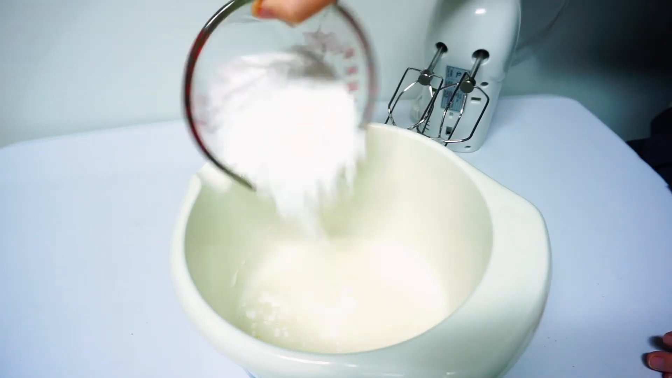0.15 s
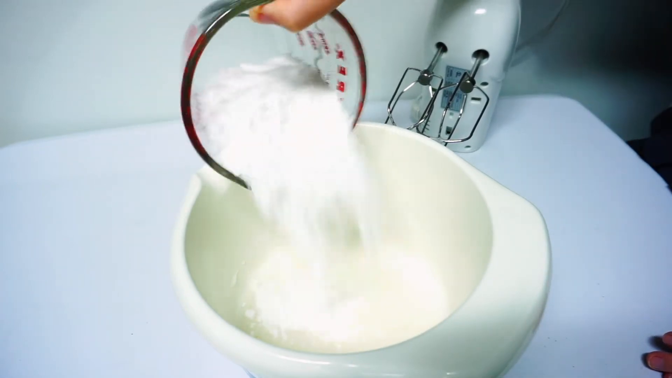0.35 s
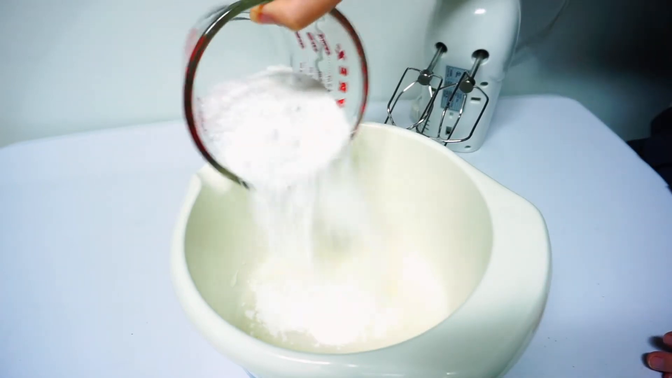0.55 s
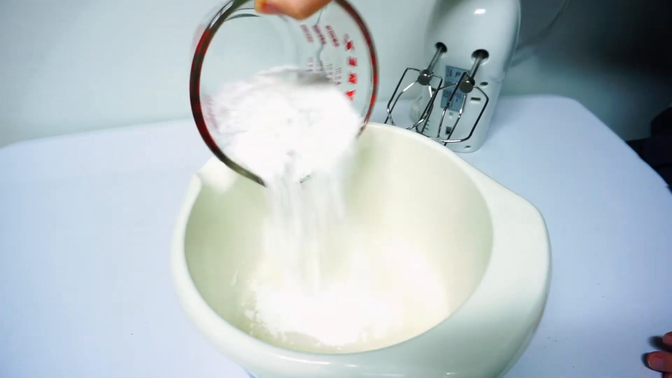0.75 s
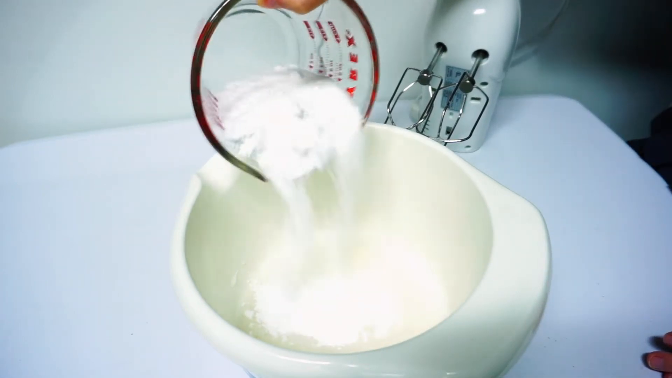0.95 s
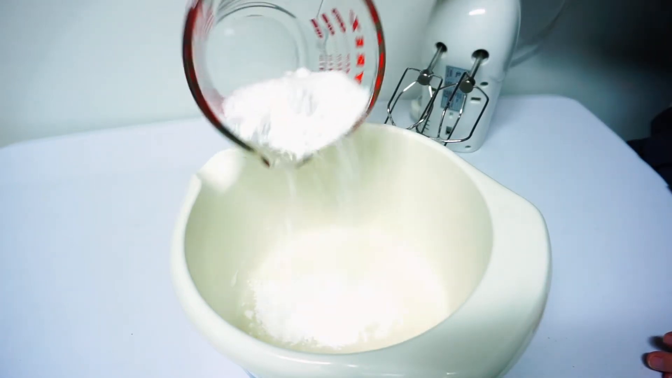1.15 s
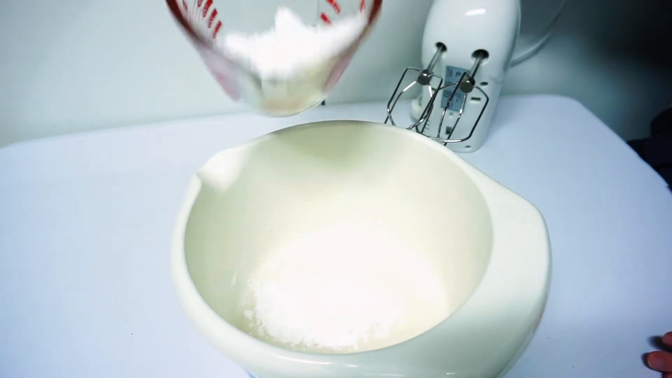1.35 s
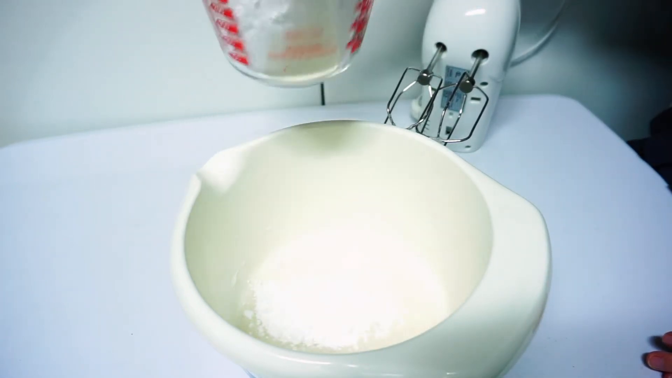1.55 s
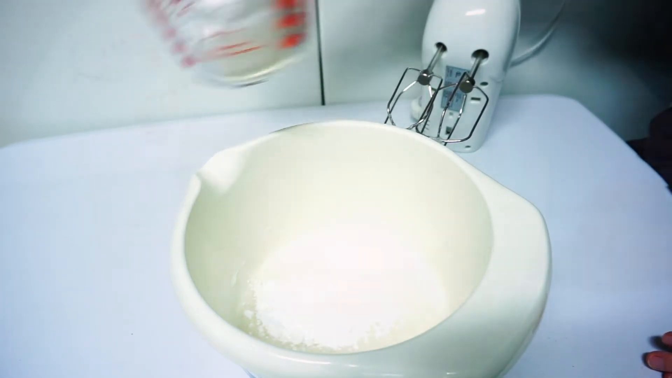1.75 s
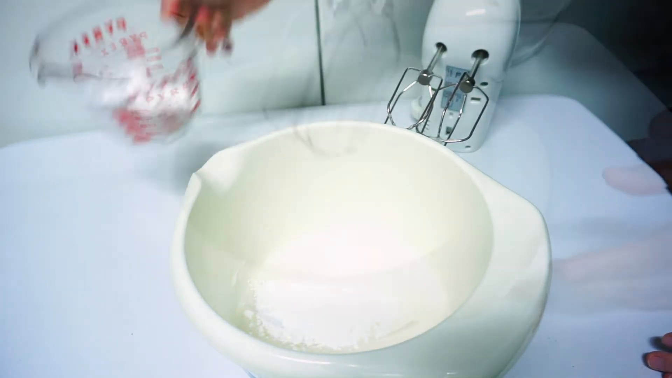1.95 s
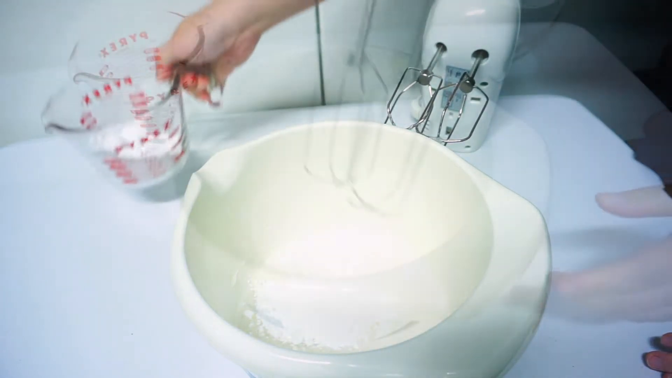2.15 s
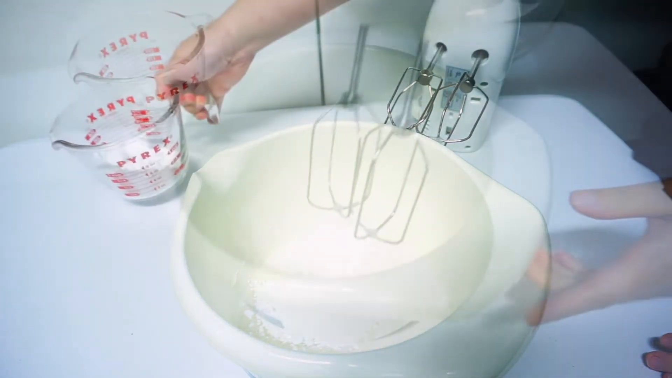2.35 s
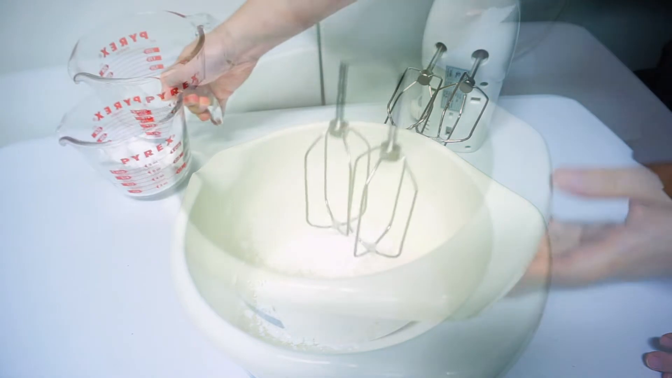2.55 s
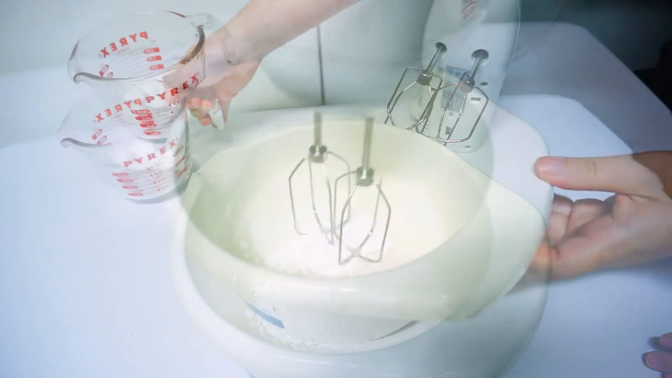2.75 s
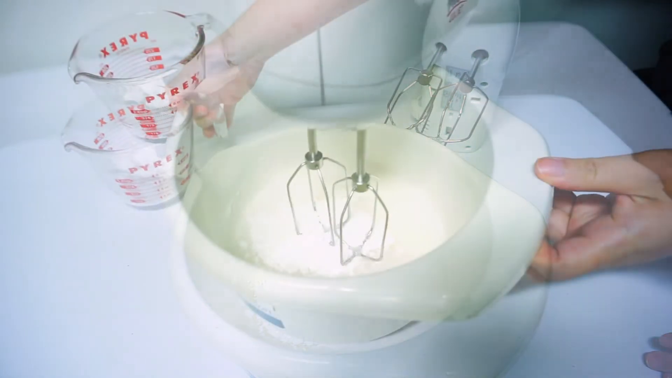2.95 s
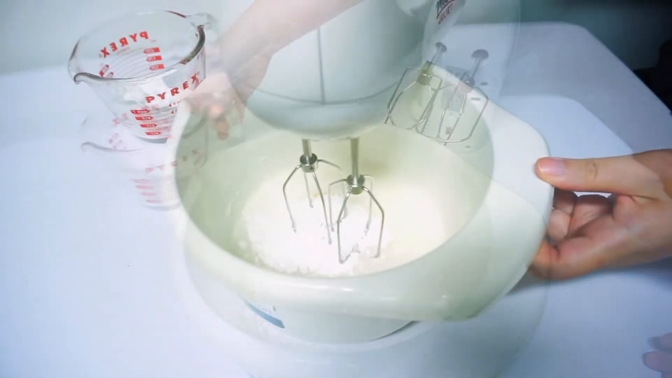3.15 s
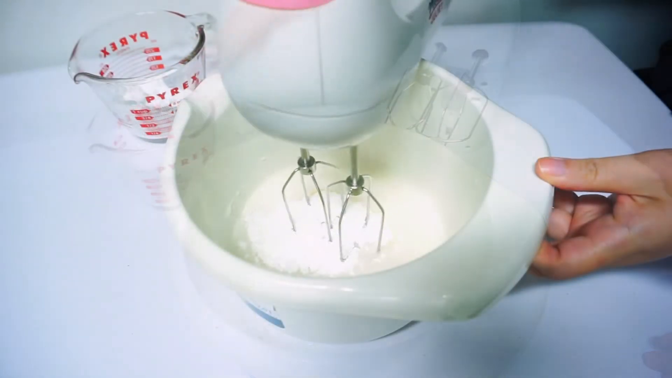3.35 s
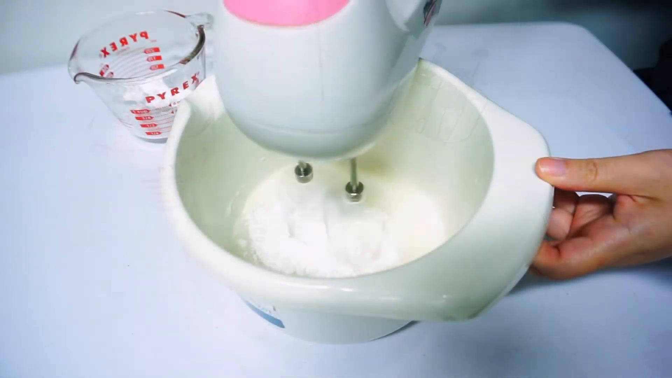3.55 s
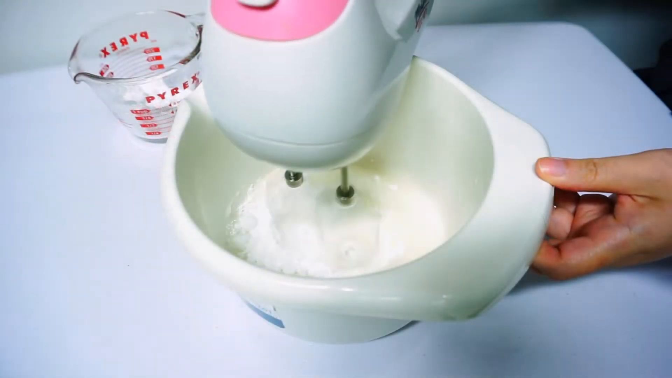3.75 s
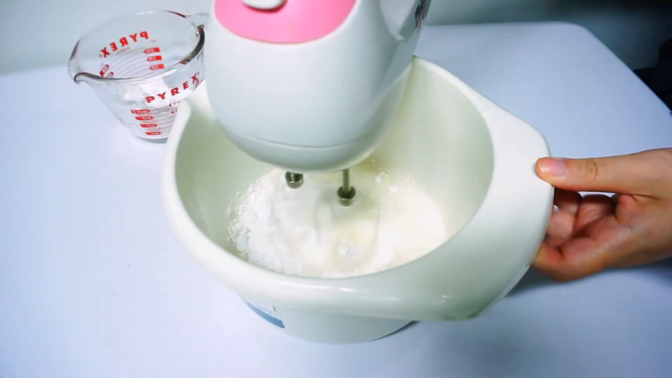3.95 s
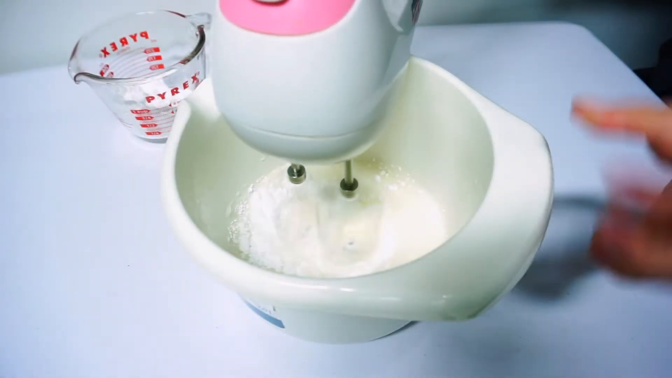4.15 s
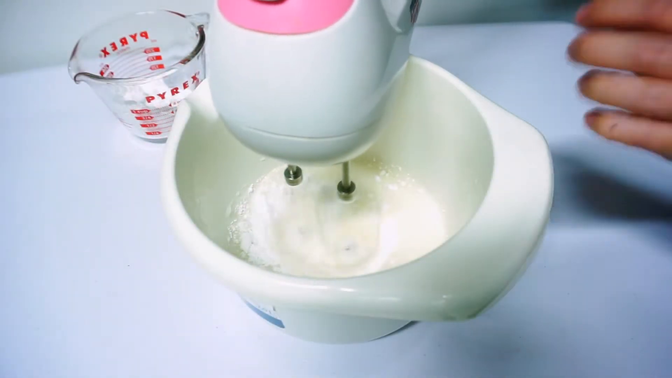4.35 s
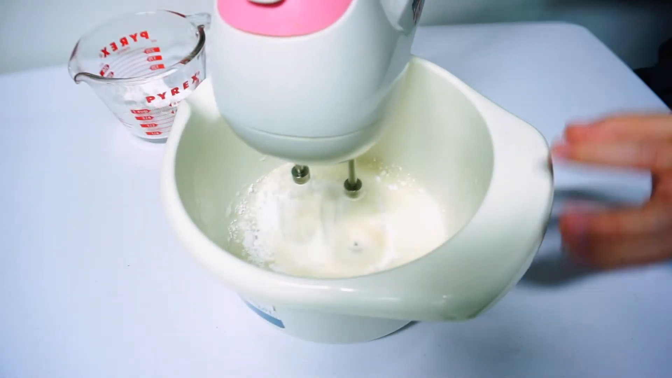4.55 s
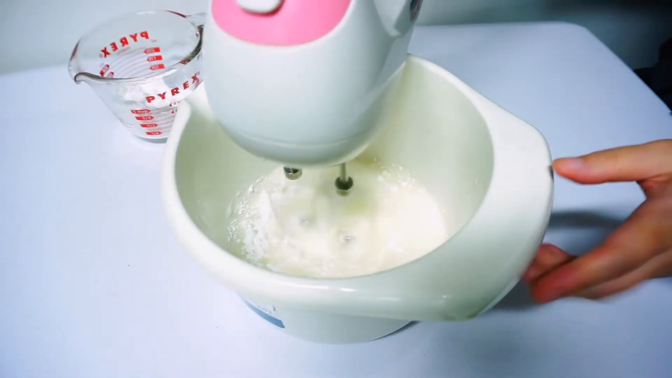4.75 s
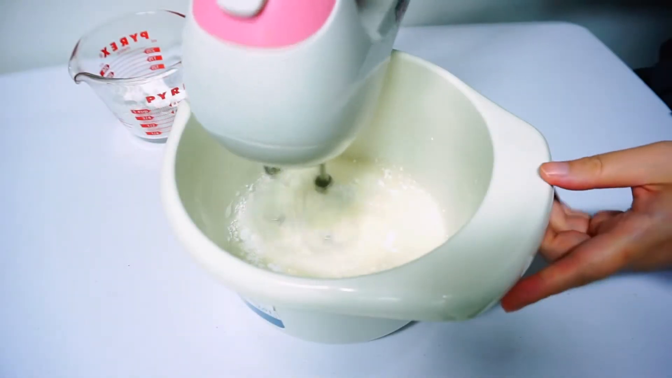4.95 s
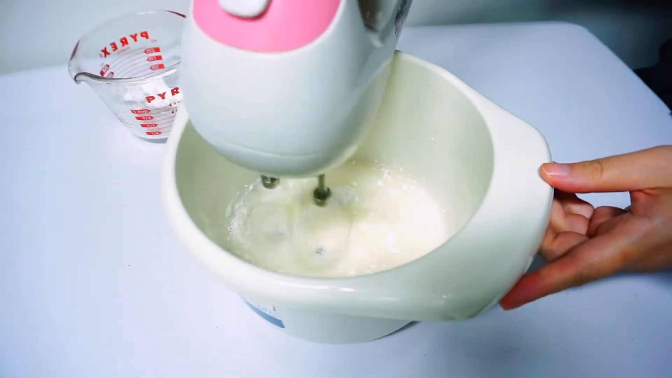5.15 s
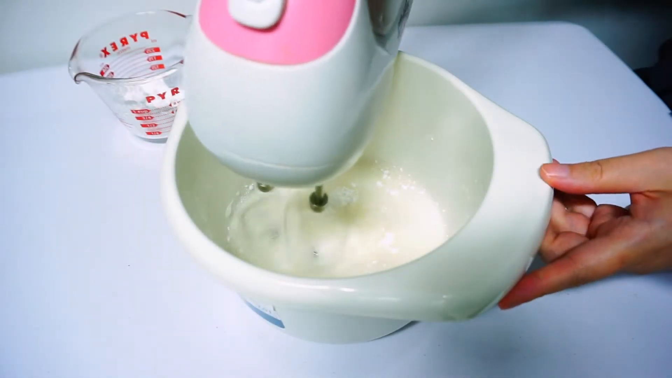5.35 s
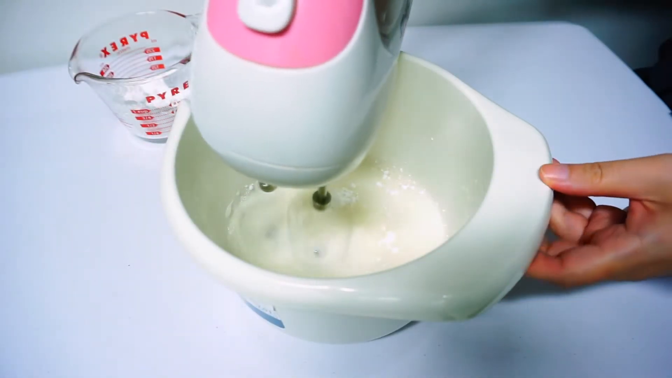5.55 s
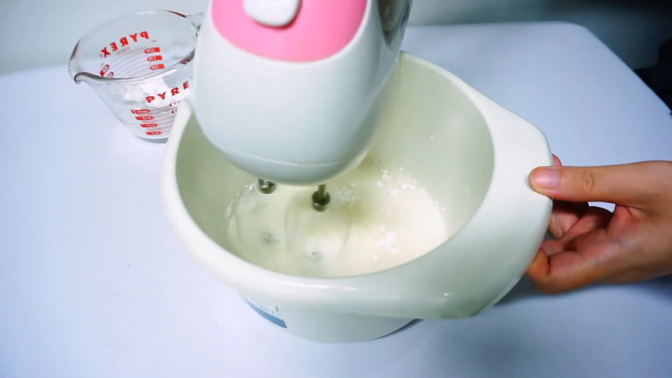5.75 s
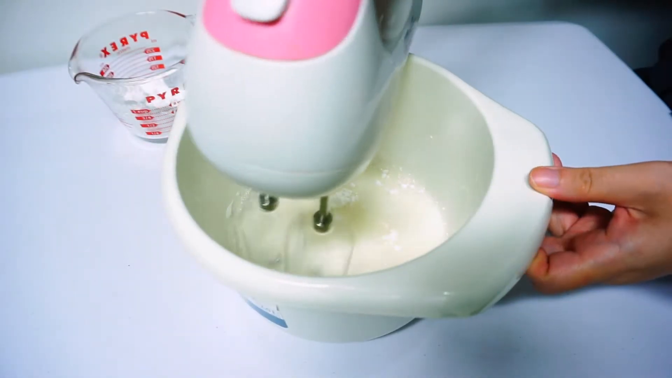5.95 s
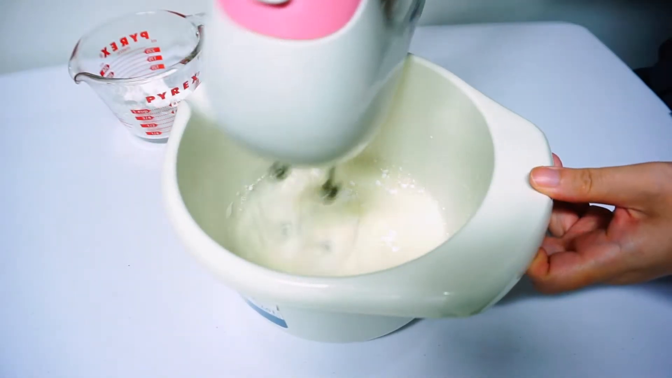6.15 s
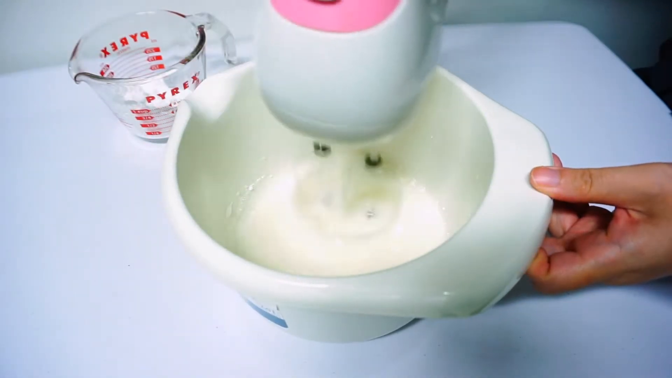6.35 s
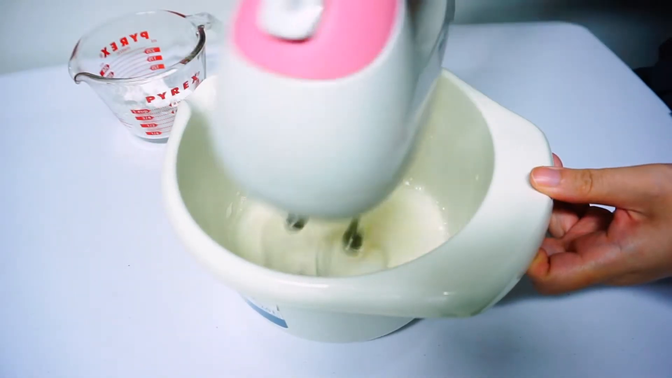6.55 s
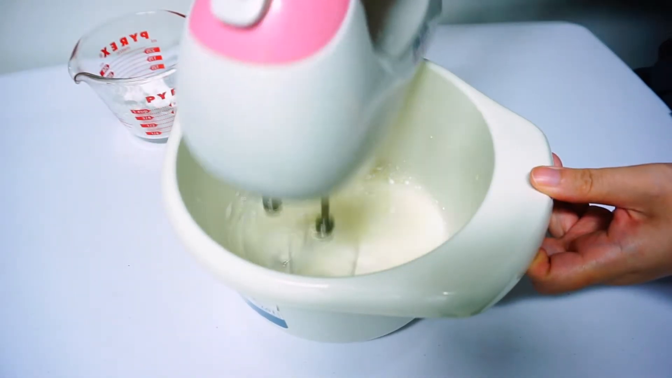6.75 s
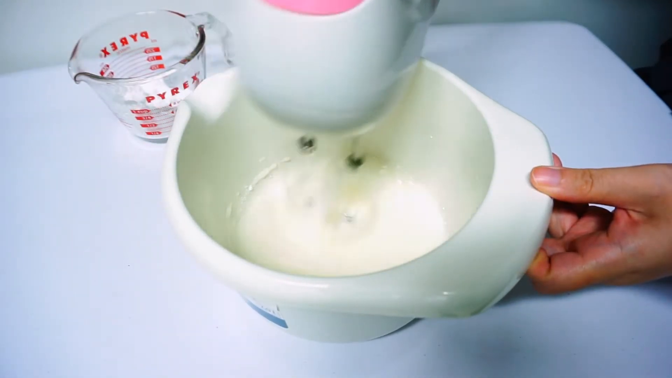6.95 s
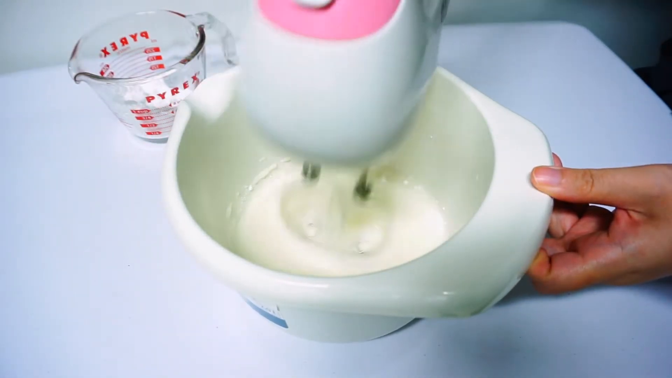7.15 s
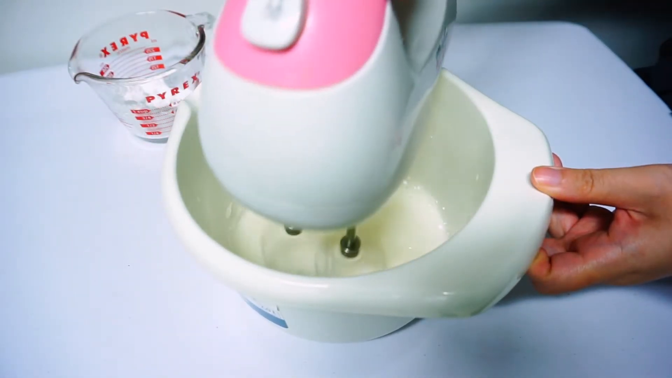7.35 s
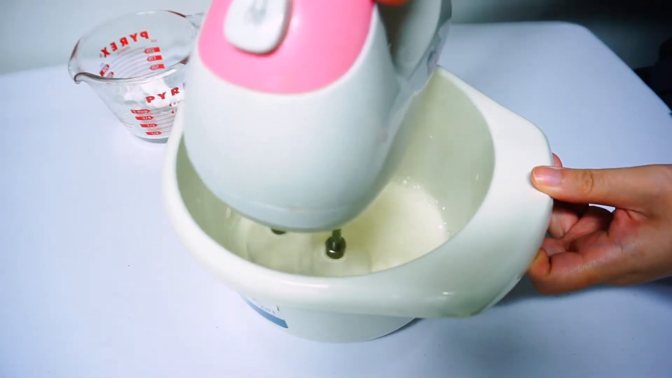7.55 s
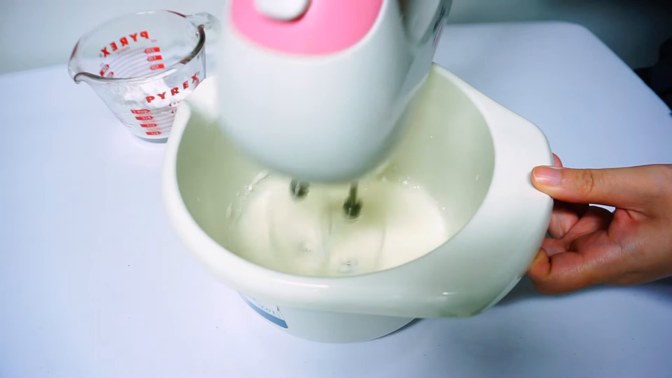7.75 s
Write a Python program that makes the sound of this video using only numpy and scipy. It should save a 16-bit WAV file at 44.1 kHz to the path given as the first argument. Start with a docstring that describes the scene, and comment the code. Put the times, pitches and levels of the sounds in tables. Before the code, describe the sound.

From the start until about 1.2 seconds, flour slides from a glass jug into a ceramic bowl in soft, grainy, hissing swells. Lumps thud into the batter and briefly ring the bowl, loudest near 0.15 seconds. A faint, dull drone underneath fades away by 3 seconds, leaving a quiet kitchen. Between 2.5 and 2.9 seconds things are set down on the table with a few light knocks, followed by a faint rub of hands. At about 3.4 seconds a switch snaps and an electric hand mixer starts. Its whine leaps up in pitch, then creeps higher and settles, over churning gears, rattling beaters and a fine buzz. It grows louder until about 5 seconds and runs steadily to the end at around 8 seconds. A beater ticks against the bowl near 3.6 seconds and several times between 4.9 and 6.6 seconds, sometimes with a brief dip in level.

```python
"""An electric hand mixer clicks on, spins up and beats steadily in a ceramic bowl on a kitchen table.
Its fan whines, its shaft tones shake with the mains, gears and beaters churn, the brushes buzz, and
now and then a beater ticks against the bowl. Before it starts, flour slides from a glass jug in soft,
grainy swells, lumps thud into the batter and ring the bowl, a dull drone fades away, things are set
down and hands take hold."""
import sys
import numpy as np
from scipy import signal
from scipy.fft import rfft, irfft
from scipy.io import wavfile
from scipy.ndimage import uniform_filter1d

SR = 44100
rng = np.random.default_rng(int(sys.argv[2]) if len(sys.argv) > 2 else 0)


def store_wav(level_fs):
    """Save 16-bit WAV to argv[1]."""
    pcm = np.round(np.clip(np.atleast_2d(level_fs), -1, 1) * 32767)
    wavfile.write(sys.argv[1], SR, pcm.T.astype(np.int16))


N = 344862
TIME = np.arange(N) / SR
FREQ = np.maximum(np.arange(N // 2 + 1) * SR / N, 1)
POUR_END_S, MOTOR_ON_S = 1.15, 3.376
MAINS_PULSE_HZ = 120
MAINS_PHASE = 2 * np.pi * MAINS_PULSE_HZ * TIME


def undb(db):
    """Decibels to gain."""
    return 10 ** (np.asarray(db) / 20)


def unit(x):
    """Scale to rms 1."""
    return x / np.sqrt(np.mean(x ** 2))


def fader(points):
    """A level ride in dB: straight lines between (t, level) points."""
    return np.interp(TIME, *np.transpose(points))


def contour(points):
    """An EQ curve in dB through (f, level) points."""
    hz, db = np.transpose(points)
    return np.interp(np.log(FREQ), np.log(hz), db)


def bumps(hz, resonances):
    """Boost or cut in dB that resonances give at a frequency."""
    return sum(db / (1 + (2 * (hz - f) / width) ** 2) for f, width, db in resonances)


def colour(x, db):
    """Apply an EQ curve."""
    return irfft(rfft(x) * undb(db), N)


def butter(x, order, hz, kind):
    """Apply a Butterworth filter."""
    return signal.sosfilt(signal.butter(order, hz, kind, fs=SR, output="sos"), x)


def noise(eq):
    """Noise of rms 1, coloured by an EQ table."""
    return unit(colour(rng.standard_normal(N), contour(eq)))


def walk(rate_hz):
    """Smooth random wander, spread near 1."""
    knots = rng.standard_normal(4096)
    path = np.interp(TIME * rate_hz, np.arange(len(knots)), knots)
    return 1.3 * uniform_filter1d(path, int(SR / rate_hz / 2) + 1)


def grains(per_s, spread_db):
    """Random clicks of uneven size."""
    clicks = (rng.random(N) < per_s / SR) * rng.standard_normal(N)
    return clicks * undb(spread_db * np.minimum(rng.exponential(size=N), 5))


def swells(table, rise_s, fall_s):
    """Envelope of soft events that grow to a peak and die away."""
    return sum(undb(db) * np.exp(-np.maximum((s - TIME) / rise_s, (TIME - s) / fall_s))
               for s, db in table)


def convolve(x, response):
    """Pass a sound through a response."""
    return signal.fftconvolve(x, response)[:N]


def reverb(x, t60_s):
    """The wet signal only: a dying wash of reflections."""
    t = TIME[:SR // 2]
    tail = rng.standard_normal(len(t)) * 1000 ** (-t / t60_s) * (1 - np.exp(-t / .003))
    return convolve(x, tail / np.linalg.norm(tail))


def hits(table, modes, ring_db, room_db, octaves, treble_db):
    """Each contact is a short crack, `octaves` wide either side, that rings the body and the room."""
    cracks, t = np.zeros(N + SR), TIME[:4096]
    for s, db, hz, decay_s in table:
        burst = rng.standard_normal(len(t)) * np.exp(-t / decay_s)
        crack = butter(burst, 2, [hz / 2 ** octaves, min(hz * 2 ** octaves, SR / 3)], "band")
        crack *= np.sqrt(decay_s * SR / 2) / np.linalg.norm(crack)
        start = int(s * SR)
        cracks[start:start + len(t)] += undb(db) * crack
    cracks, t = cracks[:N], TIME[:SR // 2]
    ring = sum(undb(db) * np.sin(2 * np.pi * hz * t) * 1000 ** (-t / t60) for hz, db, t60 in modes)
    struck = cracks + undb(ring_db) * convolve(cracks, ring)
    wet = struck + undb(room_db) * reverb(struck, t60_s=0.43)
    # the bodies radiate little bass; the top has its own level
    return butter(wet, 6, [140, 3600], "band") + undb(treble_db) * butter(wet, 4, 4000, "high")


# Stereo width, side minus mid: f/Hz, level/dB
WIDTH = [(60, -21), (110, -13), (190, -16), (350, -12), (620, -11.5), (1120, -8), (2010, -10), (3610, -0.5),
         (6480, -1), (11600, -3)]
# Pan, left minus right: f/Hz, level/dB
PAN = [(60, -3.5), (110, -0.5), (190, -0.5), (350, 2), (620, -1.0), (1120, -3), (2010, -2.0), (3610, -3),
       (6480, -0.5), (11600, -1)]
def stereo(mid):
    """Reflections differ between the ears, mostly in the treble; the bowl sits slightly right."""
    side = colour(reverb(mid, t60_s=.22), contour(WIDTH) - 2)
    pan_db = contour(PAN) / 2
    return np.array([colour(mid + side, pan_db), colour(mid - side, -pan_db)])


# Room tone EQ: f/Hz, level/dB
KITCHEN_EQ = [(30, -4), (100, -18), (200, -3), (700, -4), (3000, -3.5), (4500, -14), (11000, -20)]
def room_tone():
    """The quiet kitchen: a faint, steady bed of noise."""
    return undb(-74.5) * noise(KITCHEN_EQ)


# Drone fade: t/s, level/dB
DRONE_FADE = [(0, -55), (1.7, -62.5), (2.3, -68), (2.7, -69.5), (3, -88)]
# Drone EQ: f/Hz, level/dB
DRONE_EQ = [(59, -82.5), (100, -53.5), (215, -19.5), (248, -18.5), (277, -11), (315, -16.5), (440, -10),
            (516, -12.5), (676, -4), (819, -19), (1200, -15.5), (1360, -11), (1900, -21), (4500, -24.5),
            (5850, -41.5), (9900, -120)]
def drone():
    """A dull, wavering drone that fades away."""
    return noise(DRONE_EQ) * undb(fader(DRONE_FADE) + 0.67 * walk(9.9))


# Friction EQ: f/Hz, level/dB
RUB_EQ = [(90, -18), (170, 2), (300, -2), (700, 1.5), (1200, -10), (2200, -1.5), (3200, -2), (4200, -31),
          (11000, -21)]
# Peaks of the hand moves: t/s, level/dB
RUBS = [(2.94, -71), (3.14, -61.5), (3.34, -80)]
def hands():
    """Hands slide on bowl and mixer: soft swells of friction grains."""
    friction = unit(colour(grains(per_s=1600, spread_db=-2), contour(RUB_EQ)))
    return friction * swells(RUBS, rise_s=0.046, fall_s=0.051)


# Knocks on the table: t/s, level/dB, centre f/Hz, decay/s
KNOCKS = [(2.468, -33, 1600, 0.0041), (2.470, -40.5, 425, .012), (2.477, -35, 880, 0.0081),
          (2.576, -45, 2420, 0.0019), (2.752, -39, 1950, 0.0031), (2.755, -48.5, 280, 0.017),
          (2.89, -59.5, 259, 0.013)]
# Ring of the table top: f/Hz, level/dB, t60/s
TABLE_MODES = [(225.6, 9, 0.25), (399.6, -15, 0.37), (613, 1, 0.29), (883, -7, .25), (1075, -19, .25),
               (2050, -8, .2), (2519, 0, 0.23)]
def table_knocks():
    """Things are set down and the table top rings under them."""
    return hits(KNOCKS, TABLE_MODES, ring_db=-58, room_db=-5.5, octaves=0.96, treble_db=-6)


def stream(start_db, thin_db_per_s, fade_db_per_s):
    """Envelope of the steady pour: it thins as the jug empties, then fades."""
    thinning_db = thin_db_per_s * np.minimum(TIME, POUR_END_S)
    fading_db = fade_db_per_s * np.maximum(TIME - POUR_END_S, 0)
    return undb(start_db - thinning_db - fading_db)


# Heaps sliding off the lip of the jug: t/s, level/dB
SLIDES = [(.12, -44.5), (.295, -36.5), (.465, -37.5), (.635, -45), (.8, -46), (.962, -44.5), (1.115, -47.5)]
# EQs of the pour's body and of its powdery top: f/Hz, level/dB
RUSH_EQ = [(71, -68), (120, -29.5), (245, -21.5), (276, -14), (392, -13.5), (463, 2.5), (646, -8),
           (697, -1.5), (902, -14), (1020, -18.5), (1340, -8), (1760, -12), (1980, -10), (2690, -10.5),
           (4500, -30.5), (5850, -55), (9900, -120)]
POWDER_EQ = [(2060, -23.5), (3500, -3), (4410, -5.5), (6130, -1), (7530, -4), (9760, 1.5), (11000, -4),
             (14300, -35.5), (22000, -120)]
def flour():
    """Falling powder: a soft rush in the hollow of the bowl and a fine hiss, swelling with each slide."""
    slides = swells(SLIDES, rise_s=0.017, fall_s=.028)
    rush_gain = np.hypot(slides, stream(start_db=-50.5, thin_db_per_s=4, fade_db_per_s=39))
    hiss_gain = np.hypot(slides * undb(-6.5), stream(start_db=-54.5, thin_db_per_s=5, fade_db_per_s=13))
    rush = unit(colour(grains(per_s=4000, spread_db=-0.5), contour(RUSH_EQ)))
    hiss = unit(colour(grains(per_s=15000, spread_db=1.5), contour(POWDER_EQ)))
    return (rush * rush_gain + hiss * hiss_gain) * undb(0.95 * walk(44.23))


# Lumps landing: t/s, level/dB, centre f/Hz, decay/s
LUMPS = [(0.110, -37, 1600, .006), (0.1115, -35, 5200, .002), (0.141, -26, 1360, 0.0035),
         (0.1475, -14, 2820, 0.0031), (0.149, -24, 605, 0.0059), (0.2855, -25.5, 1310, 0.0023),
         (0.288, -26, 604, 0.0027), (0.319, -34.5, 2300, 0.0065), (0.416, -37.5, 573, 0.007),
         (0.447, -34, 1440, 0.0066), (0.452, -45, 570, 0.013), (0.472, -46, 1820, 0.0067),
         (0.770, -36, 660, 0.0037), (0.904, -40.5, 586, 0.0051), (0.962, -50, 2070, 0.0091),
         (1.105, -44, 1550, 0.0039)]
# Ring of the filled bowl: f/Hz, level/dB, t60/s
BOWL_MODES = [(471, -1, .22), (568, 2.5, 0.089), (1370, -12, .07), (2430, -2, 0.13), (2449, -5, .12),
              (2495, 9, 0.051), (2830, -7, 0.065), (3070, -5, .07), (3220, -3, .06)]
def lumps():
    """Lumps of flour thud into the batter and ring the bowl."""
    return hits(LUMPS, BOWL_MODES, ring_db=-46.5, room_db=-12, octaves=0.31, treble_db=-0.5)


# Snap and jolt: t/s, level/dB, centre f/Hz, decay/s
SWITCH_HITS = [(3.3555, -28, 6500, 0.0048), (3.359, -41, 910, 0.0074), (3.377, -33, 1260, 0.0046),
               (3.392, -30, 2300, 0.0023), (3.385, -46, 660, .012), (3.405, -34.5, 820, 0.015)]
# Ring of the wire beaters, here and in their ticks: f/Hz, level/dB, t60/s
BEATER_MODES = [(2450, -4, 0.055), (2970, -7, .07), (3185, -2, 0.11)]
def switch():
    """The switch snaps and the gears jolt into motion, ringing the beaters."""
    return hits(SWITCH_HITS, BEATER_MODES, ring_db=-36, room_db=-3.5, octaves=0.68, treble_db=-14)


# Beater on bowl: t/s, level/dB, centre f/Hz, decay/s
TICKS = [(3.553, -31, 2930, 0.004), (4.940, -32, 2870, 0.0063), (5.096, -29, 2960, 0.0064),
         (5.319, -27.5, 5000, 0.0043), (5.332, -33, 4060, .003), (5.466, -29, 2400, 0.0084),
         (5.479, -31, 2410, 0.0028), (5.772, -29, 2180, .004), (5.949, -32, 462, 0.026),
         (5.974, -38, 323, 0.013), (6.045, -22.5, 6200, 0.0022), (6.617, -26.5, 3180, 0.012)]
def beater_ticks():
    """A beater touches the bowl and its wires ring briefly."""
    return hits(TICKS, BEATER_MODES, ring_db=-34, room_db=-10, octaves=.4, treble_db=-6)


# Ducks in the mixer's level: t/s, depth/dB
DIPS = [(4.952, 6.5), (5.335, 3.5), (5.482, 7), (6.629, 10.5)]
def dips(drop_s, recover_s):
    """The level drops quickly and creeps back."""
    return undb(-sum(db * np.clip((TIME - s) / drop_s, 0, 1) * np.exp(-np.abs(TIME - s) / recover_s)
                     for s, db in DIPS))


# Spin-up as a leap, a climb and a long creep: gained f/Hz, time constant/s
SPIN_UP = [(102.1, .113), (137.2, .417), (49.8, 3.718)]
def shaft_rate(free_hz):
    """Turns a second: once switched on, the shaft closes in on its free speed."""
    running_s = np.maximum(TIME - MOTOR_ON_S, 0)
    return free_hz - sum(hz * np.exp(-running_s / lag_s) for hz, lag_s in SPIN_UP)


# Brush hiss EQ: f/Hz, level/dB
BRUSH_EQ = [(3300, -16), (4100, -9), (4800, 1), (5800, 2), (6800, 4.5), (7800, 2.5), (9000, 6.5),
            (11000, 0)]
def brushes(shaft_hz, turns, strain):
    """Brushes hiss with the mains and buzz on high shaft harmonics, most when fast and under strain."""
    throb = 1 + (0.11 + 0.08 * strain) * np.cos(MAINS_PHASE)
    hiss = noise(BRUSH_EQ) * throb * undb(3 + 0.55 * walk(16))
    buzz = sum(undb(6 * np.tanh(walk(2))) * k * np.sin(2 * np.pi * (k * turns + rng.random()))
               for k in range(20, 44))
    speed_gain = np.minimum(shaft_hz / 255, 1) ** 5
    return hiss + unit(buzz) * undb(-8 + 9 * np.sqrt(strain)) * speed_gain


# Motor partials: shaft multiple, mains pulse multiple added, labouring level/dB, full-speed level/dB
SHAFT_PARTIALS = [(1, 0, -31, -22.5), (1, 1, -33, -22), (1, 2, -17, -25), (2, 1, -22.5, -17),
                  (2, 2, -37.5, -18.5), (3, 0, -14, -30), (3, 1, -37, -22), (3, 2, -18.5, -21),
                  (4, 0, -33, -18), (4, 1, -19, -17.5), (5, 0, -14.5, -20.5), (6, 0, -16, -12.5),
                  (6, 2, -14, -16), (7, 0, -19, -24), (8, 0, -27, -14), (9, 0, -15, -21.5),
                  (10, 0, -24, -17.5), (11, 0, -19, -24.5), (13, 0, -29, -25.5)]
# Housing resonances that swell a passing tone: f/Hz, width/Hz, level/dB
HOUSING = [(835, 50, 5), (1156, 12, 9.5), (2748, 22, 11.5)]
def shaft_tones(shaft_hz, turns, strain):
    """Wavering shaft harmonics and mains sidebands; their balance shifts as the strain eases."""
    tones, labour = 0, np.minimum(strain / 0.34, 1)
    for order, sideband, labour_db, fast_db in SHAFT_PARTIALS:
        offset_hz = sideband * MAINS_PULSE_HZ
        db = fast_db + labour * (labour_db - fast_db) + bumps(order * shaft_hz + offset_hz, HOUSING)
        phase = 2 * np.pi * (order * turns + offset_hz * TIME + rng.random())
        tones += undb(db + 2 * walk(7)) * np.sqrt(2) * np.sin(phase)
    # the small casing radiates little bass; the tones fade in with speed
    return butter(tones, 6, 290, "high") * undb(1 - 32 * strain ** 6)


# Blade-rate harmonics, first to third: level/dB
BLADE_DB = [-38.3, -44, -54]
# How well the casing lets the whine out: f/Hz, level/dB
CASING_EQ = [(330, -23), (480, -2.5), (800, 1.5), (1500, -2), (2100, 1.5), (2500, -2.5), (3200, -2.5),
             (3425, -3), (3455, -15), (3510, -10.5), (3545, -6.5), (3700, -6), (4000, -24), (5600, -20),
             (6250, -15.5), (7100, -13), (8800, -22), (9900, -3.5), (10700, 0), (11100, -17)]
# The air vents ring with the fan and swallow a pitch just above: f/Hz, width/Hz, level/dB
VENTS = [(2768, 155, 13), (3040, 224, -17)]
def fan_whine(turns, strain, blades=12):
    """Passing blades whine; mains pulses jerk the rotor, so the tone growls and splits under strain."""
    jitter = (0.13 + 0.7 * strain ** 8) * walk(260) + .5 * walk(12)
    phase = 2 * np.pi * blades * turns + jitter + 0.23 * strain * np.sin(MAINS_PHASE)
    throb = 1 + (.2 + .6 * strain) * np.cos(MAINS_PHASE) + .3 * strain * np.cos(2 * MAINS_PHASE)
    whine = sum(undb(db + 2.64 * walk(14)) * np.sqrt(2) * np.sin(k * phase)
                for k, db in enumerate(BLADE_DB, 1))
    # each partial swells and fades as it climbs through the resonances
    return colour(whine * throb, contour(CASING_EQ) + bumps(FREQ, VENTS))


# Churn EQ: f/Hz, level/dB
CHURN_EQ = [(71, -77), (120, -27), (258, -13.5), (295, -16), (380, -12), (476, -2.5), (828, -1),
            (962, -3.5), (1190, 0.5), (1400, -5.5), (2060, 0.5), (2290, -6), (2660, 1.5), (3650, -11),
            (4300, -18), (5590, -54), (9460, -120)]
# Hollows of bowl and casing: f/Hz, width/Hz, level/dB
HOLLOWS = [(817, 37, 6.5), (1273, 200, 4.5), (1512, 90, 8.5), (1866, 110, 6), (2150, 100, 8.5),
           (2850, 260, 0)]
def gear_churn(turns, strain):
    """Gear teeth and beater wires rattle, hardest once a turn and on each mains pulse."""
    throb = 1 + (0.059 + 0.066 * strain) * np.cos(MAINS_PHASE)
    turn_accent = 1 + 0.16 * np.cos(2 * np.pi * turns)
    rattle = grains(per_s=9000, spread_db=1) * throb * turn_accent
    churn = unit(colour(rattle, contour(CHURN_EQ) + bumps(FREQ, HOLLOWS)))
    return churn * undb(-1 + 0.95 * walk(25))


# The beaters bite into the flour, run free, then sink into the batter: t/s, level/dB
EFFORT = [(3.39, -50.5), (3.47, -45.5), (3.57, -39.5), (3.86, -45), (4.2, -40.5), (4.55, -35.5), (5.2, -33),
          (5.8, -32), (6.6, -31.5), (7, -33), (7.82, -31.3)]
def mixer():
    """A universal motor: torque pulses with the mains, most strongly while it is still slow."""
    shaft_hz = shaft_rate(free_hz=321.65)
    turns = np.cumsum(shaft_hz) / SR
    strain = 1 - (shaft_hz / shaft_hz.max()) ** 4  # near 1 at the start, 0 at top speed
    works = gear_churn(turns, strain)
    works += undb(-13) * brushes(shaft_hz, turns, strain)
    works += shaft_tones(shaft_hz, turns, strain)
    gate = np.clip((TIME - MOTOR_ON_S) / 0.0039, 0, 1)
    return (undb(fader(EFFORT)) * works + fan_whine(turns, strain)) * gate


def scene():
    """Pouring, setting things down, then mixing, over the quiet kitchen."""
    foley = lumps() + table_knocks() + switch()
    ticks = beater_ticks()
    pour = flour()
    mixing = (mixer() + ticks) * dips(drop_s=0.0042, recover_s=0.1)
    background = drone() + hands() + room_tone()
    return stereo(background + foley + pour + mixing)


def record(dry):
    """A steep low-pass takes off the top treble."""
    top_hz = 11080
    return signal.sosfilt(signal.ellip(12, .2, 80, top_hz, fs=SR, output="sos"), dry)


dry = scene()
out = record(dry)
store_wav(out)
```